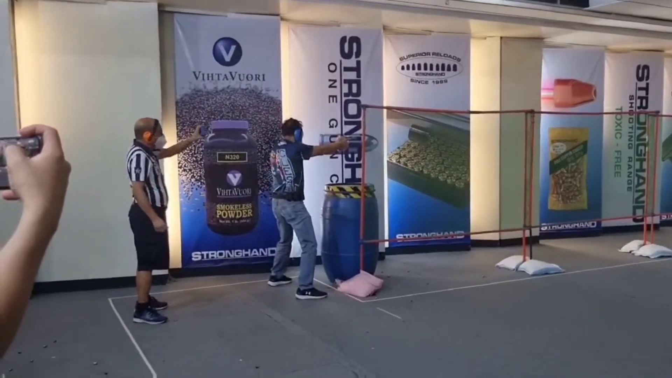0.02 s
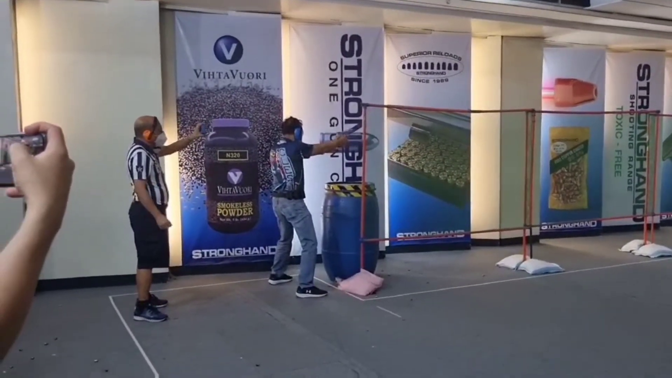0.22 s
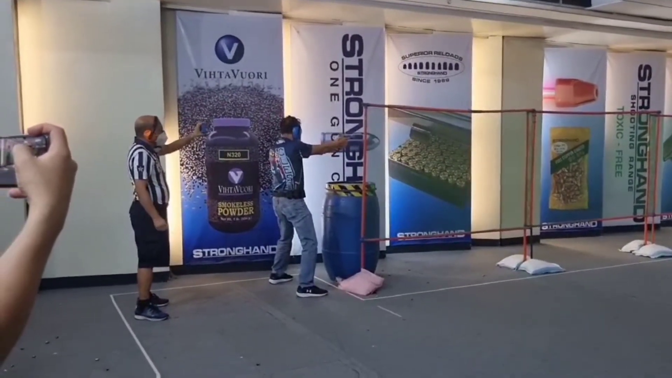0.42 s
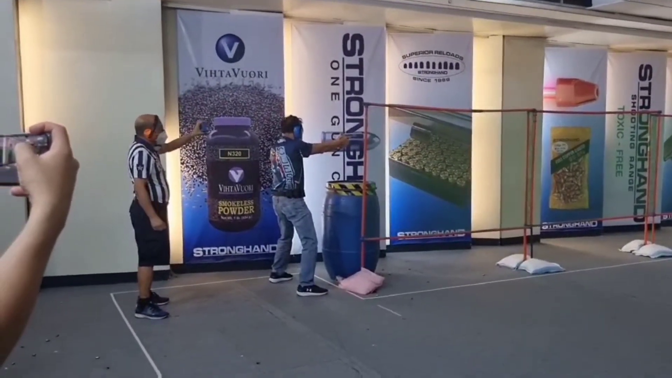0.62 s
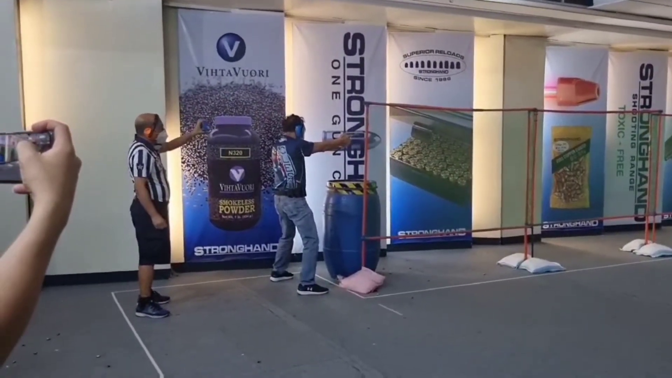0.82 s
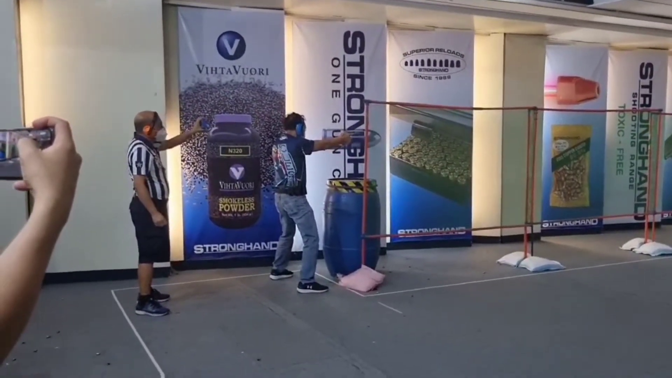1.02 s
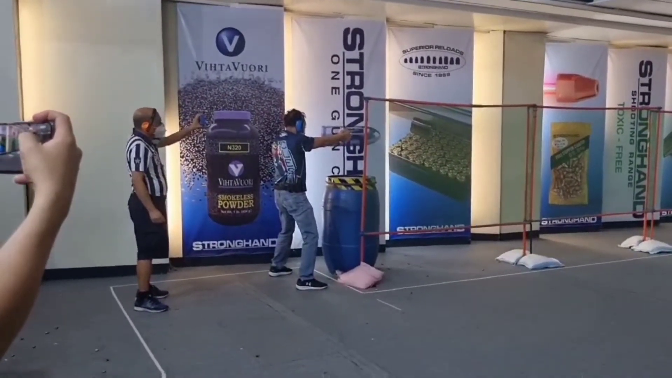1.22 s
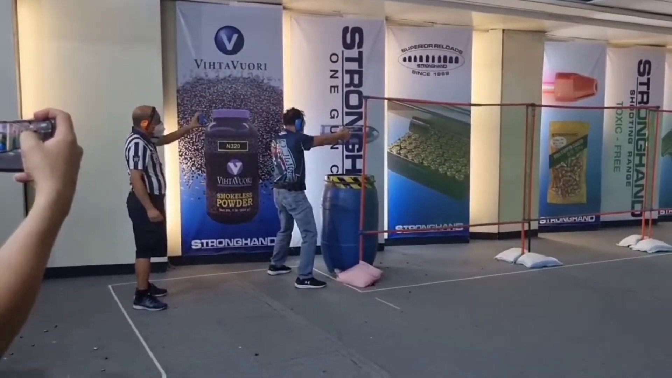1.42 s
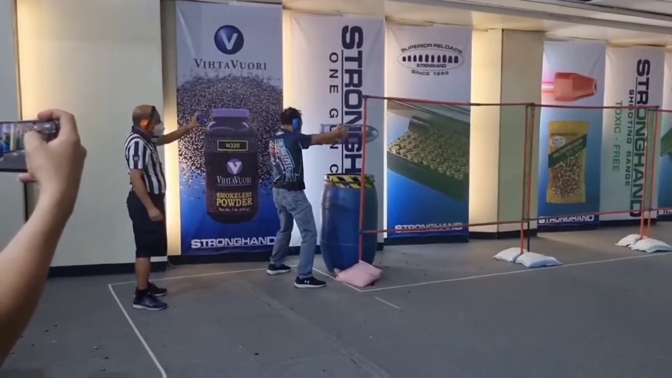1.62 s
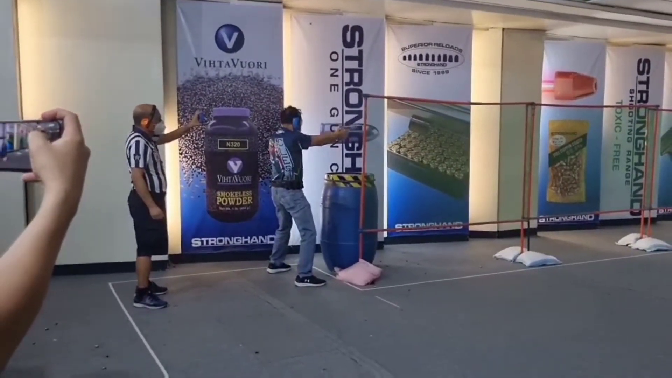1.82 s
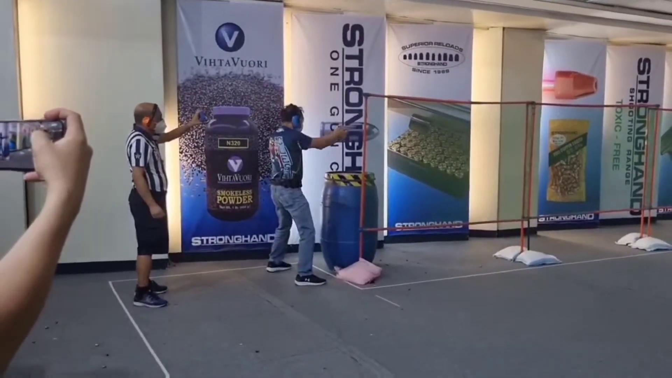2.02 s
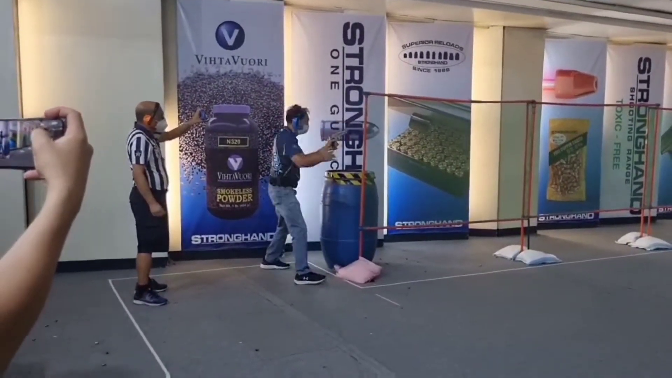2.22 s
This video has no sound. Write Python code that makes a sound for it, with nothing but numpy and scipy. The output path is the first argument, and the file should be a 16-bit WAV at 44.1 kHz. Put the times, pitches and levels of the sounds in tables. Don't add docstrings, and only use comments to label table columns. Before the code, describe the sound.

Two loud pistol shots over a second apart boom and echo through a large concrete hall.

```python
import sys
import numpy as np
from scipy import signal
from scipy.fft import rfft, irfft, next_fast_len
from scipy.io import wavfile
from scipy.ndimage import uniform_filter1d, minimum_filter1d, map_coordinates

SR = 44100
rng = np.random.default_rng(int(sys.argv[2]) if len(sys.argv) > 2 else 0)


def boost(x):
    u = np.asarray(x, float) / 20
    return 10 ** u


def waveform_to_disk(signal):
    frames = np.transpose(np.atleast_2d(signal))
    scaled = np.clip(frames, -1, 1) * 32767
    samples = np.round(scaled).astype(np.int16)
    wavfile.write(sys.argv[1], SR, samples)


N = 101430
TIME_S = np.arange(N) / SR

# start in seconds, strength in dB, brightness in dB per octave.
SHOT_EVENTS = [
    (0.2462, 1, 1),
    (1.5621, 1, 1),
]
# frequency in Hz, level in dB per Hz.
HALL_SPECTRUM = [(30, -40), (60, -13), (130, -6), (400, -1), (1450, -7.5), (3600, -12.5), (9500, -22),
                 (15200, -17.5)]
# frequency in Hz, time to fall 60 dB in seconds.
HALL_DECAY = [(60, 0.88), (200, 0.65), (600, 0.79), (2000, 0.75), (4000, 0.66), (8000, 0.57), (12000, 0.51),
              (15000, 0.32)]
# centre in Hz, width in Hz, gain in dB.
HALL_RESONANCES = [(206, 76, 1), (820, 79, 3.5), (4360, 170, 2), (9250, 750, -2)]
# delay in seconds, spread in seconds, gain in dB.
WALL_SWELLS = [
    (.006, 0.0087, 0.5),
    (.16, 0.039, 4.5),
    (.24, 0.03, 0),
    (.37, 0.039, 0.5),
]
# frequency in Hz, left-right correlation (0 to 1).
STEREO_LIKENESS = [(40, 1), (90, .45), (140, .92), (300, .9), (640, 0.68), (1400, 0), (15000, 0.01)]
# frequency in Hz, left minus right in dB.
STEREO_LEAN = [(60, -1), (130, -1), (290, 2), (640, 2.5), (1410, -1.0), (3100, -3), (6820, -0.5),
               (15000, 0)]
# start in seconds, peak in dB, ring in Hz.
KNOCK_EVENTS = [
    (1.4291, -29.5, 1420),
    (2.245, -49, 2070),
]
# start in seconds, length in seconds, level in dB, brightness in dB per octave.
RUSTLE_EVENTS = [
    (-.03, 0.46, -49, 0),
    (.12, 0.2, -55.5, -6),
    (1.968, 0.11, -50.5, 11),
    (2.142, 0.17, -50.5, -2),
]
# frequency in Hz, level in dB per Hz.
CLOTH_SPECTRUM = [(60, -26), (150, -13), (430, -12), (1200, -14.5), (2200, -22), (8000, -30), (14500, -36)]
# frequency in Hz, level in dB per Hz.
AIR_SPECTRUM = [(90, -9), (160, -16), (400, -21), (900, -24.5), (1500, -27), (4000, -33), (8000, -35),
                (15500, -58.5)]
# frequency in Hz, level in dB.
DUCT_TONES = [(221, -71), (253, -68.5), (328, -75), (383, -70)]
# frequency in Hz, level in dB per Hz.
RUMBLE_SPECTRUM = [(20, -14), (45, 10), (70, 14), (100, -20), (150, -18)]
# time in seconds, gain in dB.
BACKGROUND_DRIFT = [(0, 3.5), (.12, 6), (.24, 12), (.8, -2.5), (1.5, 0.5), (2.1, 0.5), (2.3, -1.5)]


def unit(x):
    return x / np.sqrt(np.mean(x ** 2) + 1e-20)


def along(points, hz):
    point_hz, value = np.transpose(points)
    return np.interp(np.log(hz + 1), np.log(point_hz + 1), value)


def wobble(rate_hz):
    knots = rng.standard_normal(int(N * rate_hz / SR) + 4)
    return map_coordinates(knots, [np.arange(N) * rate_hz / SR])


def filtered(x, response):
    n = x.shape[-1]
    m = next_fast_len(n + 8192)
    return irfft(rfft(x, m) * response(np.fft.rfftfreq(m, 1 / SR)), m)[..., :n]


def diffuse(spectrum, tilt_db=0):
    def mid_side(hz):
        octaves = np.log2((hz + 20) / 1000)
        angle = np.arccos(np.clip(along(STEREO_LIKENESS, hz), -1, 1)) / 2
        return boost(along(spectrum, hz) + tilt_db * octaves) * [np.cos(angle), np.sin(angle)]

    def lean(hz):
        return boost(along(STEREO_LEAN, hz) * np.array([[0.5], [-0.5]]))

    mid, side = filtered(rng.standard_normal((2, N)), mid_side)
    return unit(filtered(np.array([mid + side, mid - side]), lean))


def dying(noise, decay_share, far_db):
    far_slower, build_up_s = 2.64, 0.002
    hz, t, z = signal.stft(noise, SR, nperseg=256)
    fall_db = -60 * t / (decay_share * along(HALL_DECAY, hz)[:, None])
    fall = boost(fall_db) + boost(far_db + fall_db / far_slower)
    tail = signal.istft(z * fall, SR, nperseg=256)[1][:, :N]
    return tail * (1 - np.exp(-TIME_S / build_up_s))


def add(out, x, start_s):
    i = round(start_s * SR)
    out[:, i:] += x[:, :N - i]


def shots():
    earlier_db, earlier_t60_s = -51.5, 0.2
    lean_db, lean_s = 5, 0.045
    out = boost(earlier_db - 60 * TIME_S / earlier_t60_s) * diffuse(HALL_SPECTRUM)
    front = boost(lean_db * np.exp(-TIME_S / lean_s) * np.array([[-0.5], [0.5]]))
    for start_s, db, tilt_db in SHOT_EVENTS:
        add(out, boost(db) * front * (blast() + hall_tail(tilt_db)), start_s)
    return out


def blast():
    blast_db, blast_s, bass_cut_hz = 2, 0.0002, 146.4
    echo_db, echo_range_db, echo_span_s = -4, 6, 0.02
    paths = np.zeros((2, N))
    paths[:, 0] = 1
    for ear in paths:
        when, size = rng.random((2, 12))
        ear[(40 + when * echo_span_s * SR).astype(int)] = boost(echo_db - echo_range_db * size)
    paths = filtered(paths, lambda hz: 1j * hz / (bass_cut_hz + 1j * hz))
    u = np.arange(400) / SR / blast_s
    pulse = (1 - u) * np.exp(-u)
    return boost(blast_db) * signal.fftconvolve(paths, [pulse], axes=1)[:, :N]


def hall_tail(tilt_db):
    tail_db, uneven_db, decay_share, far_db = 2, 1.0, 0.88, -41
    swell_db = sum(db * np.exp(-((TIME_S - s) / spread_s) ** 2) for s, spread_s, db in WALL_SWELLS)
    tail = dying(favoured(diffuse(HALL_SPECTRUM, tilt_db)), decay_share, far_db)
    return boost(tail_db + swell_db + uneven_db * wobble(30)) * tail


def favoured(noise):
    def response(hz):
        return boost(sum(db * np.exp(-((hz - mid_hz) / wide_hz) ** 2) for mid_hz, wide_hz, db in HALL_RESONANCES))

    return filtered(noise, response)


def knocks():
    ring_t60_s, attack_s = 0.022, 0.0014
    tick_db, tick_t60_s = -23.5, 0.016
    answer_db, decay_share, far_db = -16.5, 0.47, -19
    out = np.zeros((2, N))
    for start_s, db, hz in KNOCK_EVENTS:
        ring = np.sin(2 * np.pi * hz * TIME_S) * boost(-60 * TIME_S / ring_t60_s)
        ring = ring * (1 - np.exp(-TIME_S / attack_s)) ** 2
        edge = [(hz, -6), (2 * hz, 0), (3 * hz, -2), (5 * hz, -22)]
        tick = boost(tick_db - 60 * TIME_S / tick_t60_s) * diffuse(edge)
        colour = [(0.17 * hz, -30), (0.54 * hz, -4), (hz, 0), (1.6 * hz, -3),
                  (1.6 * hz, -12), (2.3 * hz, -17), (8 * hz, -34)]
        answer = boost(answer_db) * dying(diffuse(colour), decay_share, far_db)
        add(out, boost(db) * (ring + tick + answer), start_s)
    return out


def rustle():
    out = np.zeros((2, N))
    for start_s, length_s, db, tilt_db in RUSTLE_EVENTS:
        progress = np.clip((TIME_S - start_s) / length_s, 0, 1)
        swell = np.sin(np.pi * progress ** 1.33) ** 0.73
        out += boost(db + 1.2 * wobble(52)) * swell * diffuse(CLOTH_SPECTRUM, tilt_db)
    return out


def unsteady_tone(hz, db):
    level = boost(db + 1 + 1.3 * wobble(9.16))
    return level * np.sin(2 * np.pi * np.cumsum(hz + 2.18 * wobble(14.1)) / SR)


def fan():
    hum_hz, hum_db = 112.2, -57
    air_db, air_wander_db, rumble_db = -58, 0.6, -74
    air = boost(air_db + air_wander_db * wobble(3.9)) * diffuse(AIR_SPECTRUM)
    hum = unsteady_tone(hum_hz, hum_db)
    duct = sum(unsteady_tone(hz, db) for hz, db in DUCT_TONES)
    rumble = filtered(rng.standard_normal((2, N)), lambda hz: boost(along(RUMBLE_SPECTRUM, hz)))
    drift_db = np.interp(TIME_S, *np.transpose(BACKGROUND_DRIFT))
    return boost(drift_db) * (air + hum + duct + boost(rumble_db) * unit(rumble))


def scene():
    return shots() + knocks() + rustle() + fan()


def gain_control(x):
    knee_db, squeeze, span = -17.5, 0.49, int(0.005 * SR)
    bass_hz, bass_knee_db, bass_squeeze = 146.4, -44, 0.17
    level_db = 10 * np.log10(np.abs(uniform_filter1d((x ** 2).mean(0), span)) + 1e-12)

    def gain(knee_db, squeeze):
        cut_db = -squeeze * np.maximum(level_db - knee_db, 0)
        return boost(uniform_filter1d(minimum_filter1d(cut_db, span), span))

    bass = filtered(x, lambda hz: 1 / (1 + (hz / bass_hz) ** 4))
    return (x - bass + bass * gain(bass_knee_db, bass_squeeze)) * gain(knee_db, squeeze)


def top_cut(x):
    return signal.sosfilt(signal.butter(12, 16480, fs=SR, output="sos"), x)


def record(dry):
    port_hz, port_wide_hz, port_db = 2374, 670, 5
    ceiling, top_hz = 0.9, 15250

    def port(hz):
        damping = 1j * hz * port_wide_hz
        return 1 + boost(port_db) * damping / (port_hz ** 2 - hz * hz + damping)

    x = gain_control(filtered(dry, port))
    x = x / (1 + np.abs(x / ceiling) ** 4) ** (1 / 4)
    x = filtered(x, lambda hz: 1 / (1 + (hz / top_hz) ** 90))
    return top_cut(x)


dry = scene()
out = record(dry)
waveform_to_disk(out)
```